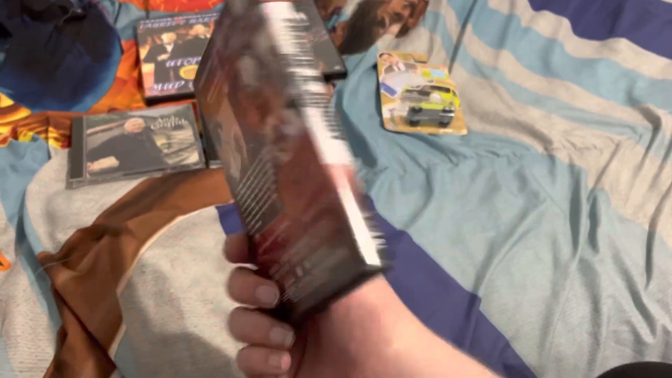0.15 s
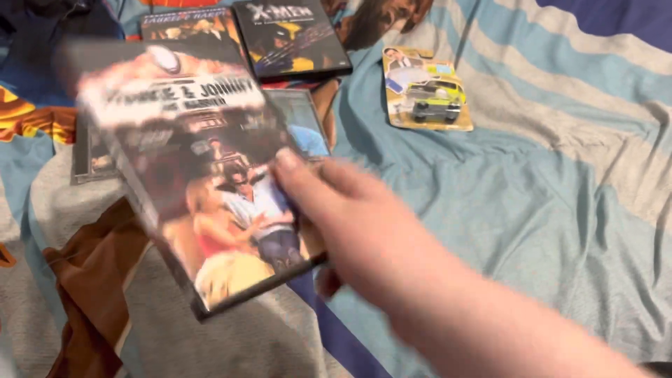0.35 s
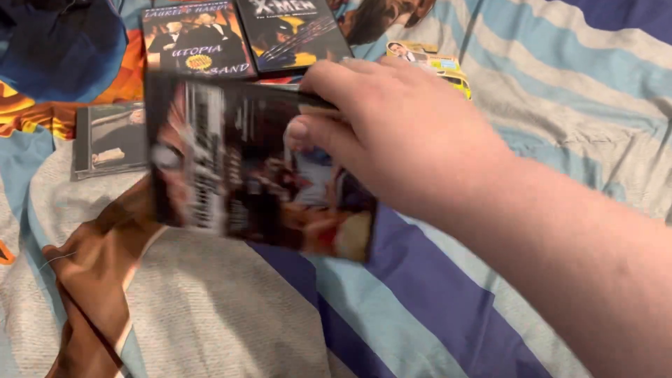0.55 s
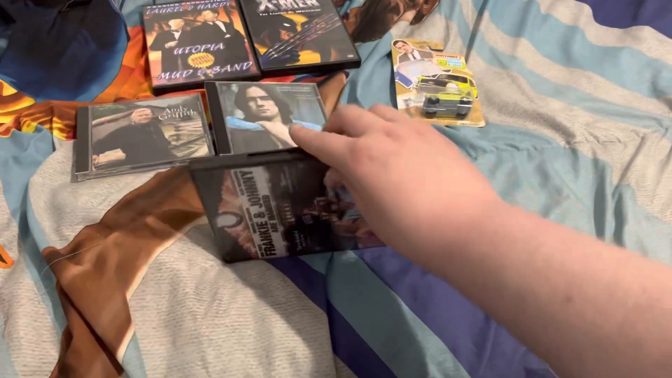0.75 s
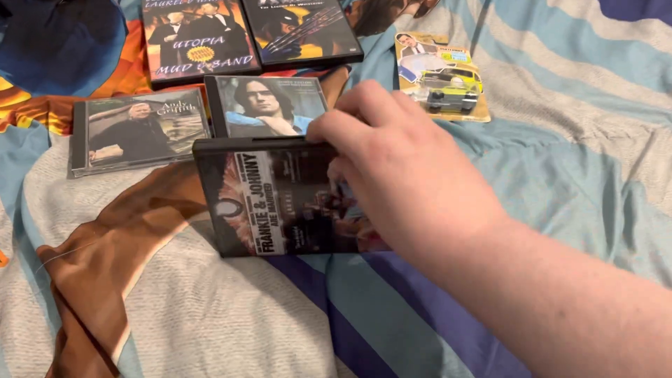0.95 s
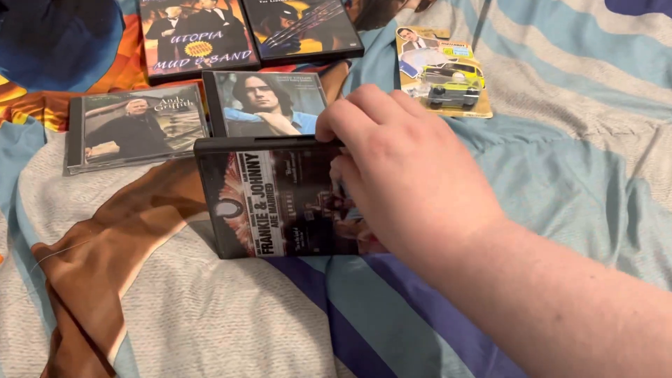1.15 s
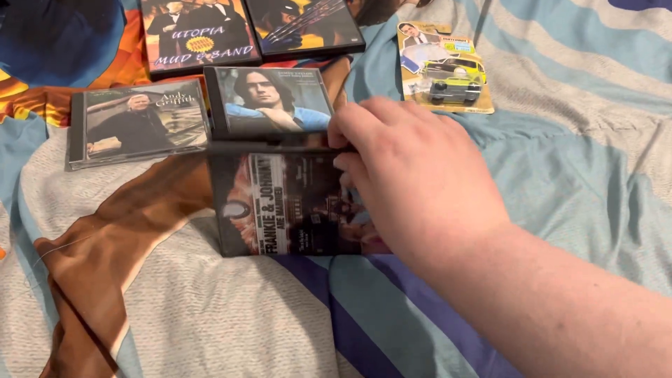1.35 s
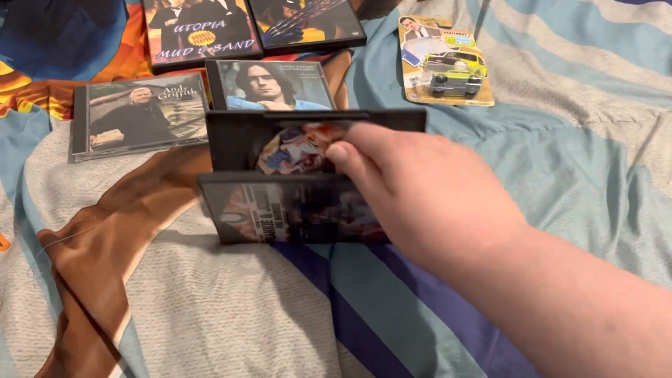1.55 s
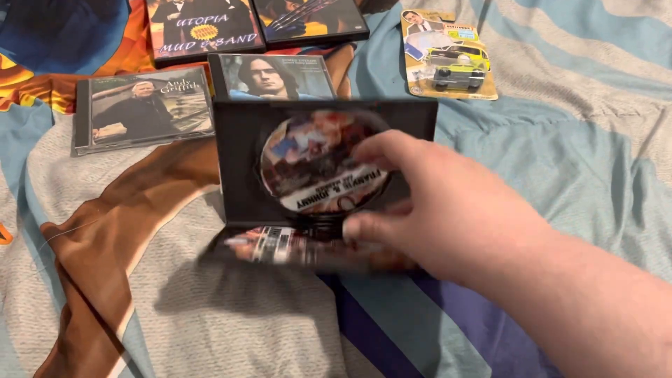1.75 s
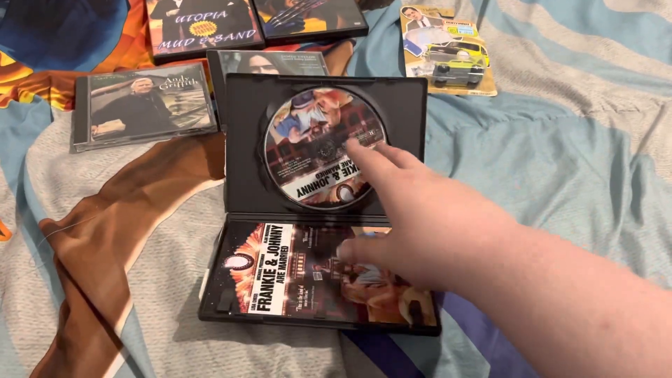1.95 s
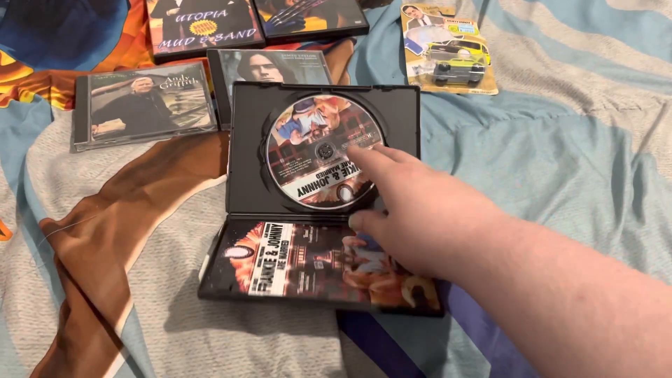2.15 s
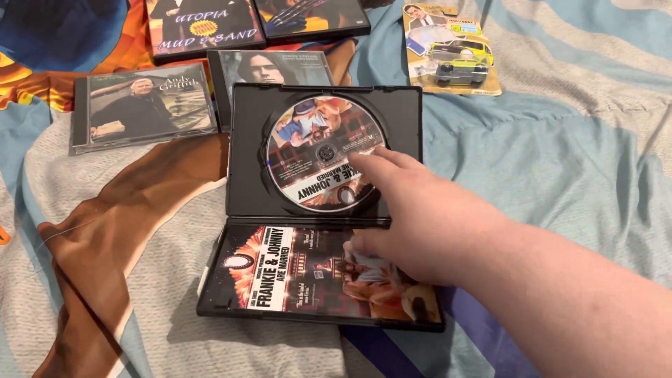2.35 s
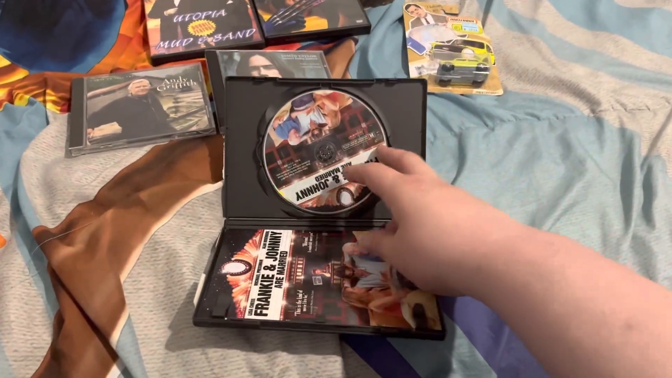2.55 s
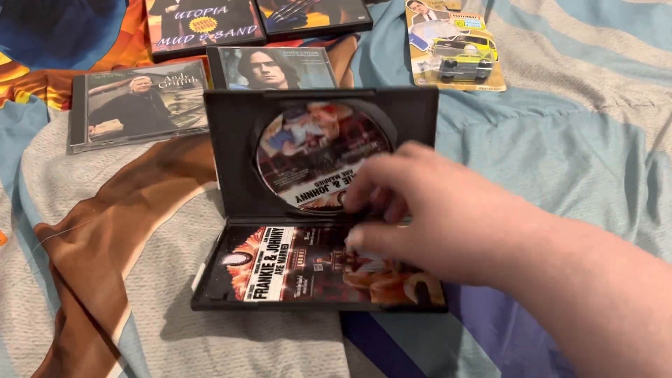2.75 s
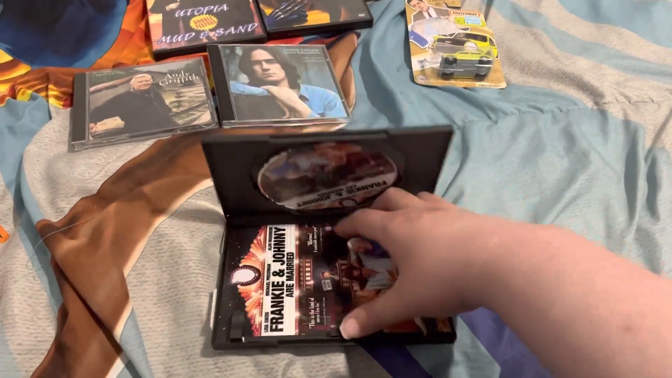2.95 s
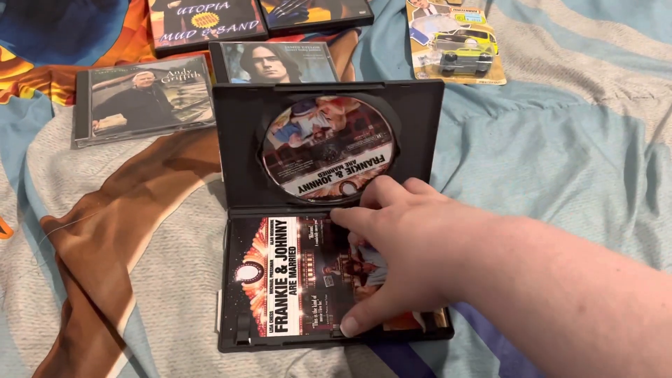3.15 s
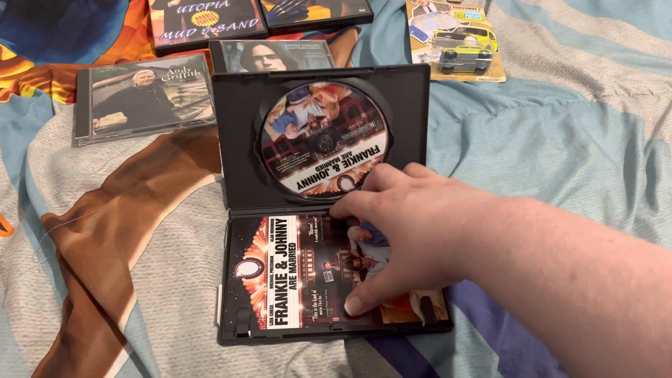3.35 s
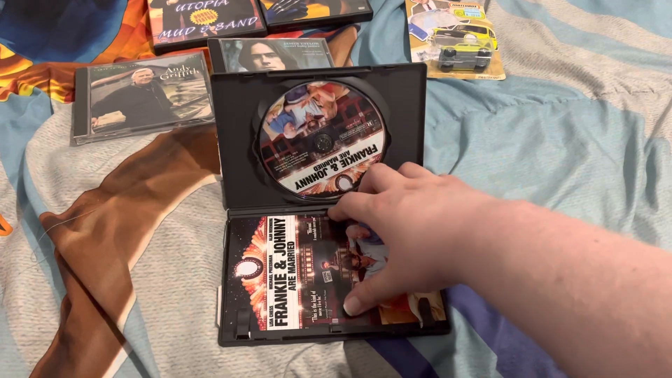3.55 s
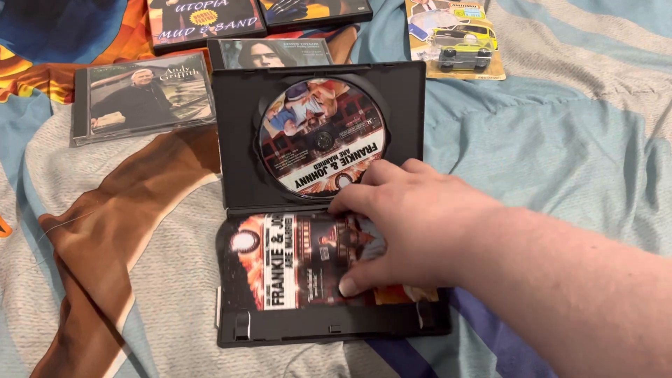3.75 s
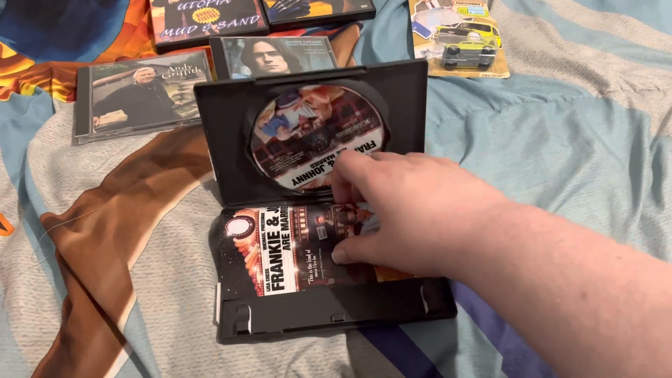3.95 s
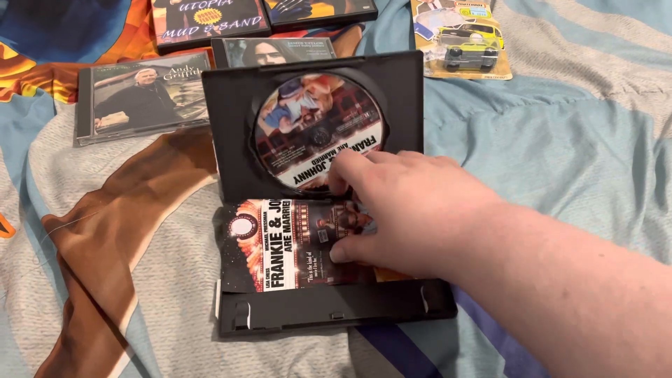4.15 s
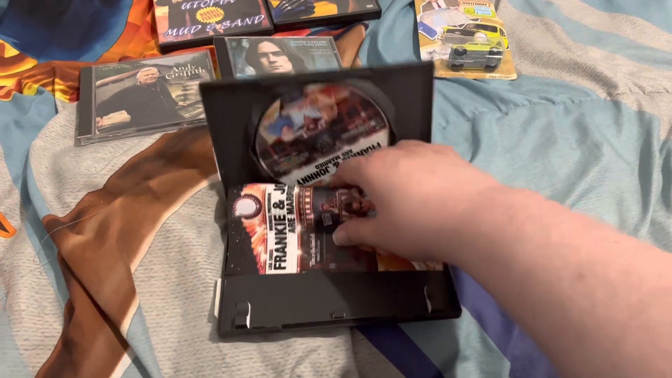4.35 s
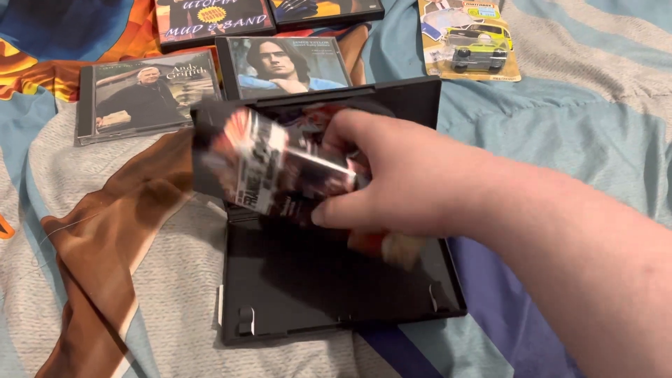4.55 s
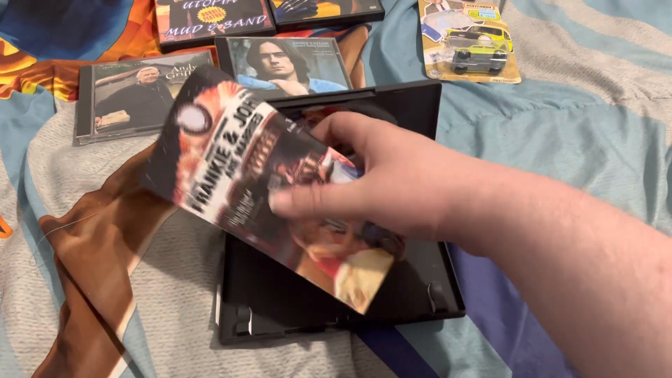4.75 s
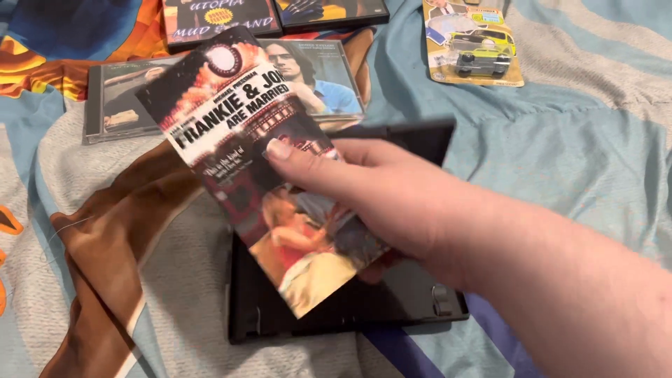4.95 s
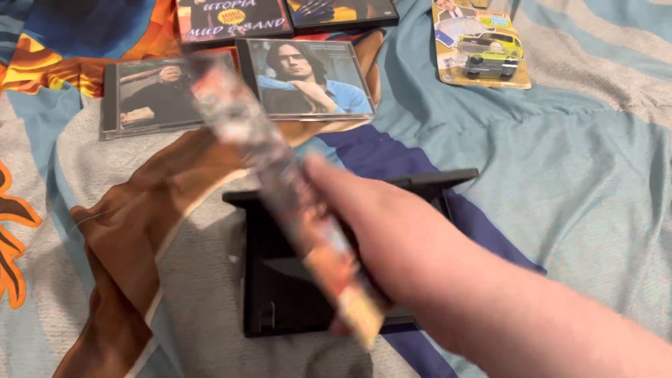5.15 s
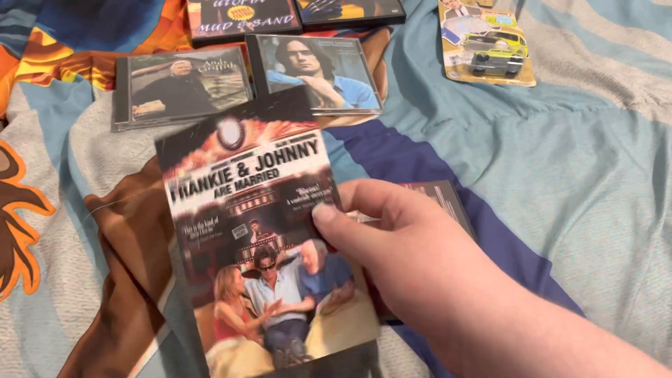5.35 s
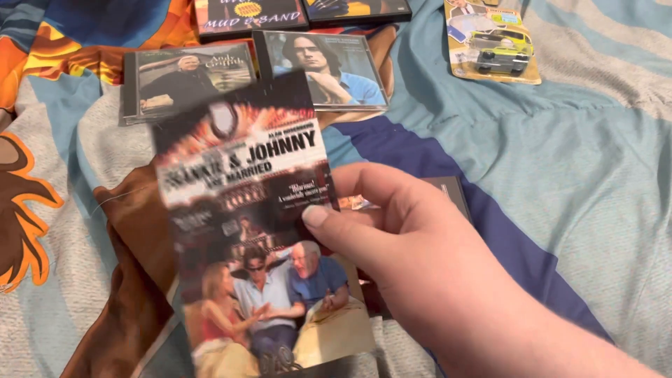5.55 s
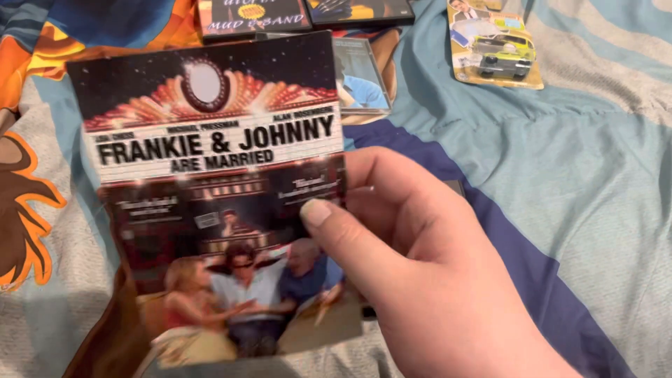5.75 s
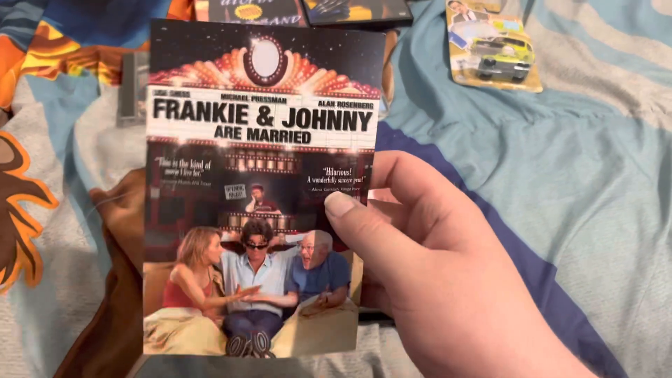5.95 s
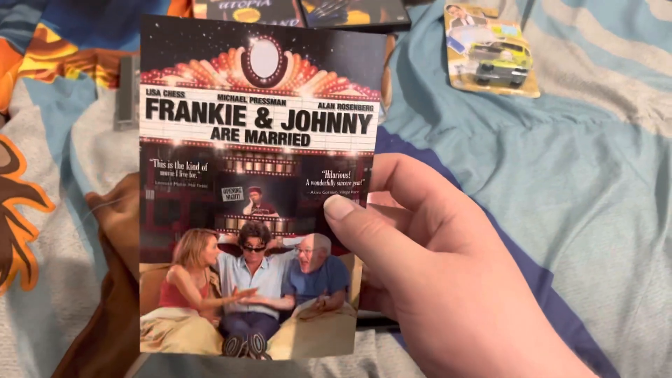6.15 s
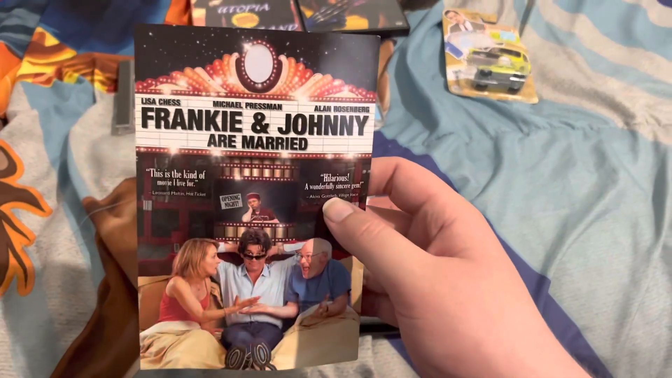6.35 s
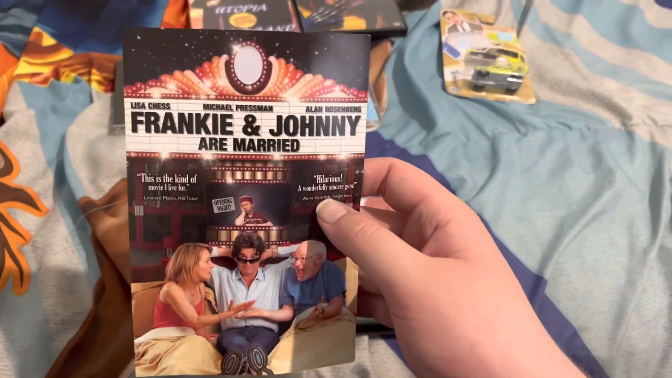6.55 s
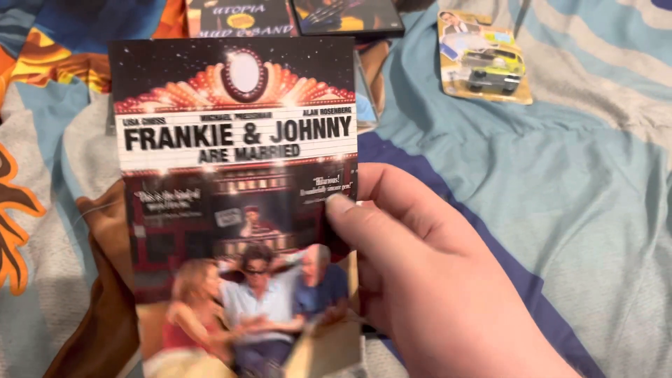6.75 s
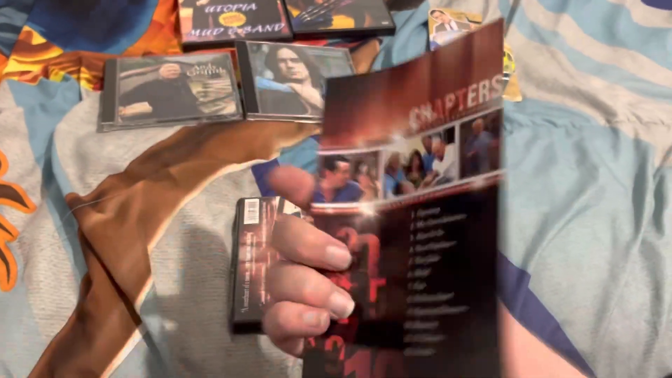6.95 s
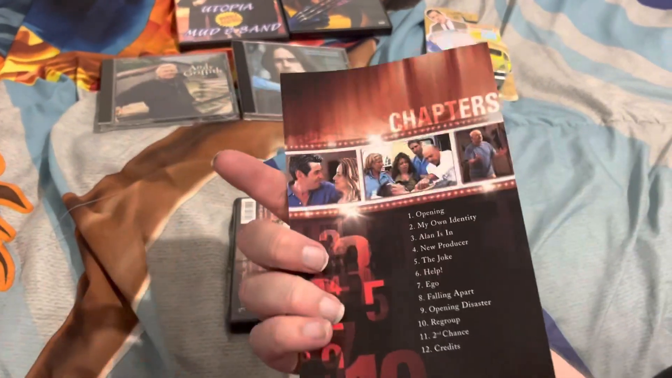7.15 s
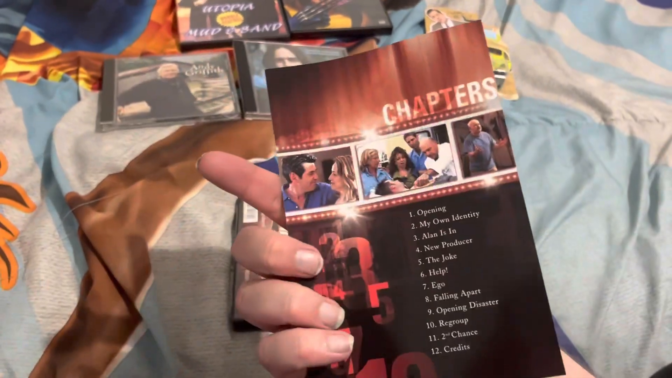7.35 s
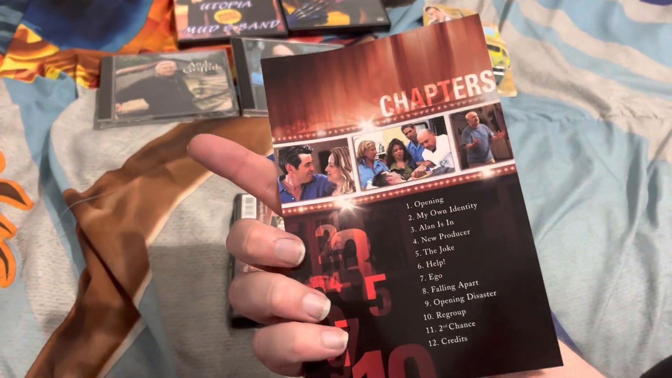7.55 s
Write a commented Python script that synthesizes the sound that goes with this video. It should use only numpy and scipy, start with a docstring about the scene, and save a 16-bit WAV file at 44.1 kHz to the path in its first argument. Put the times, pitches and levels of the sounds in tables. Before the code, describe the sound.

Close stereo handling sounds, slightly left of centre, with little echo. Soft finger rubbing and small ticks lead to a sharp plastic crack ringing briefly in a hollow shell. Quiet shuffling and scattered clicks follow, then a paper sheet rasps out from plastic clips in a rapid crackling cluster. Paper flexes and flicks gently afterwards, with bedding rustle, a low hum and still air beneath.

```python
"""A hand turns a plastic disc case over on a bed, snaps it open, pulls a glossy paper insert from its clips
and flips it. Clicks and snaps are short noise bursts that ring in the hollow case. Fingers and paper slide as
gritty hiss and a coarser scrape, fingertips and corners knock softly, and panels and bedding move low down.
A faint wavering hum and still air fill a quiet, soft room, heard by two close microphone ports."""
import sys
import numpy as np
from scipy import signal
from scipy.fft import rfft, irfft, next_fast_len
from scipy.io import wavfile
from scipy.ndimage import uniform_filter1d

SR = 44100
rng = np.random.default_rng(int(sys.argv[2]) if len(sys.argv) > 2 else 0)


def materialize(psi):
    """Save the field psi as 16-bit PCM at rate SR to the path in sys.argv[1].

    A 1-D psi becomes a single channel; in a 2-D psi each row is a channel.
    """
    bounded = np.clip(np.atleast_2d(psi).T, -1, 1)
    quanta = np.round(bounded * 32767).astype(np.int16)
    wavfile.write(sys.argv[1], SR, quanta)


def attenuation_scalar(level_db):
    """Turn a level in dB into a linear amplitude multiplier (20 dB per decade)."""
    decades = np.asarray(level_db, float) / 20
    return 10 ** decades


N = 335013
CLOCK = np.arange(0, N / SR + .002, .001)  # times at which the event levels are worked out [s]


def evened(x):
    """Scales to rms 1."""
    return x / np.sqrt(np.mean(x ** 2) + 1e-20)


def read(points, hz):
    """Reads a spectrum table on a log-frequency axis."""
    f, value = np.transpose(points)
    return np.interp(np.log(hz + 1), np.log(f + 1), value)


def curve(rows, column, t):
    """Reads one column of a time table."""
    rows = np.asarray(rows)
    return np.interp(t, rows[:, 0], rows[:, column])


def band(x, lo_hz, hi_hz, order=2):
    """Band-pass."""
    return signal.sosfilt(signal.butter(order, [lo_hz, hi_hz], "band", fs=SR, output="sos"), x)


def resonate(x, hz, width):
    """Shifts hz down to zero, smooths, shifts back: a resonance of gain 1."""
    turn = np.exp(2j * np.pi * np.cumsum(hz * np.ones(len(x))) / SR)
    r = np.exp(-np.pi * width / SR)
    smooth = signal.lfilter([1 - r], [1, -r], x / turn + 1e-18)
    return 2 * (turn * smooth).real


def grit(per_s, spread_db, hiss):
    """Friction: a hiss plus sparse tiny catches of uneven size."""
    size = attenuation_scalar(spread_db * np.minimum(rng.exponential(1, N), 4))
    size = size * (rng.random(N) < per_s / SR)
    return hiss * rng.standard_normal(N) + evened(size * rng.standard_normal(N))


def power(start, end, start_db, end_db, rise, fall):
    """Power over time of each event: rises to its start, runs to its end, then falls (dB per second)."""
    start, end, start_db, end_db = (np.reshape(v, (-1, 1)) for v in (start, end, start_db, end_db))
    along = np.clip((CLOCK - start) / np.maximum(end - start, 1e-4), 0, 1)
    db = start_db + (end_db - start_db) * along
    db = db - rise * np.maximum(start - CLOCK, 0) - fall * np.maximum(CLOCK - end, 0)
    return attenuation_scalar(2 * np.maximum(db, -140))


def gain(*powers):
    """Adds powers and gives the gain at every sample."""
    return np.interp(np.arange(N) / SR, CLOCK, np.sqrt(np.vstack(powers).sum(0)))


# colour of the still air and microphone hiss: (frequency [Hz], relative level [dB per Hz])
AIR_COLOUR = [(12, -60.5), (20, -27.5), (75, -13), (89, -8.5), (108, -2), (131, -21), (147, -23),
              (599, -41), (652, -40), (1320, -43.5), (16500, -54.5)]
# how alike the air is left and right: (frequency [Hz], likeness [0 to 1])
AIR_LIKENESS = [(60, 0.81), (240, 0.42), (950, 0.18), (3770, 0.24), (15000, 0.12)]
AIR_DB = -70.5  # level of the left port between 87 and 16000 Hz


def air():
    """Still room air and microphone hiss, most alike in both ports in the bass."""
    hz = np.fft.rfftfreq(N, 1 / SR)
    left, other = rfft(rng.standard_normal((2, N)))
    same = np.clip(read(AIR_LIKENESS, hz), -1, 1)
    right = same * left + np.sqrt(1 - same ** 2) * other
    pair = irfft(np.array([left, right]) * attenuation_scalar(read(AIR_COLOUR, hz)), N)
    return attenuation_scalar(AIR_DB) * pair / np.std(band(pair[0], 87, 16000))


# loudness of the hum: (time [s], level [dB])
HUM_LEVEL = [(0.0, -56.5), (0.4, -60), (1.5, -62), (2.5, -63), (4.0, -56), (4.74, -59), (5.6, -64),
             (6.5, -70.5), (7.0, -65), (7.6, -66)]
HUM_HZ, HUM_WIDTH_HZ = 102, 9


def hum():
    """A faint low tone that wavers: a steady sine plus noise narrowed around the same pitch."""
    waver = resonate(rng.standard_normal(N), HUM_HZ, HUM_WIDTH_HZ)
    waver = resonate(waver, HUM_HZ, 3 * HUM_WIDTH_HZ)
    t = np.arange(N) / SR
    steady = np.sqrt(2) * np.sin(2 * np.pi * HUM_HZ * t)
    return attenuation_scalar(curve(HUM_LEVEL, 1, t)) * evened(0.69 * steady + 0.81 * evened(waver))


# how long the room's echoes take to die by 60 dB: (frequency [Hz], time [s])
ECHO_TIMES = [(200, 0.084), (800, 0.16), (3000, 0.063), (10000, 0.36)]


def room(x):
    """Sparse echoes of random sign, each band dying at its own speed, different at each port."""
    taps = np.zeros((2, SR // 2))
    at = np.arange(200, SR // 2 - 20, 20) + rng.integers(0, 20, (2, (SR // 2 - 201) // 20))
    np.put_along_axis(taps, at, rng.choice([-1., 1.], at.shape), 1)
    hz, t, z = signal.stft(taps, SR, nperseg=256)
    z *= attenuation_scalar(-60 * t / read(ECHO_TIMES, hz)[:, None]) * (hz[:, None] > 100)
    tail = signal.istft(z, SR, nperseg=256)[1]
    return signal.fftconvolve(x[None], tail / np.linalg.norm(tail[0]), axes=1)[:, :N]


# how far the left port leads the right: (frequency [Hz], phase [radians])
PORT_LEAD = [(0, 0), (1030, .6), (1720, .1), (2400, .6), (3800, 1.1), (5200, -.1), (7200, -2.1),
             (7800, -np.pi), (9300, -np.pi), (10800, -2 * np.pi), (12900, -2 * np.pi), (14600, -3 * np.pi),
             (22050, -3 * np.pi)]
# gain on the difference between the ports: (frequency [Hz], gain [dB])
PORT_DIFFERENCE = [(60, -20.5), (350, -16.5), (600, 5), (4000, 5), (7000, -4), (7800, -11.5), (9300, -13.5),
                   (10200, -6.5), (11300, -23.5), (13600, -9), (15000, -16.5)]


def ports(pair):
    """Two close ports: their difference is scaled and their phases turned apart, by frequency."""
    size = next_fast_len(N + 2048)
    hz = np.fft.rfftfreq(size, 1 / SR)
    left, right = rfft(pair, size)
    both = (left + right) / 2
    apart = (left - right) / 2 * attenuation_scalar(read(PORT_DIFFERENCE, hz))
    turn = np.exp(.5j * read(PORT_LEAD, hz))  # half the lead goes to each port
    return irfft(np.array([(both + apart) * turn, (both - apart) / turn]), size)[:, :N]


# jolts that shake the whole case and leave it rattling; levels are relative within each layer:
# (time [s], hiss level [dB], brightness [dB per octave], drag level [dB], bump level [dB])
JOLT_EVENTS = [(0.668, -51.5, 3, -52, -50), (0.912, -65, -2, -65.5, -54.5), (0.985, -67, 1.05, -92, -60),
               (1.019, -70.5, 0.1, -63, -53.5), (1.204, -42, 4, -45, -40.5), (1.309, -77, 3, -77, -44),
               (1.363, -20.5, -0.75, -20, -25), (1.501, -42.5, -2, -66.5, -28.5),
               (1.603, -41.5, 1, -48, -37.5), (1.771, -69, -2.5, -84, -62), (1.82, -65.5, 1.5, -77, -51),
               (1.858, -59.5, 5, -76, -47), (2.165, -75.5, 3, -97, -72), (2.561, -85, 3, -94.5, -60.5),
               (2.584, -81, 2.5, -92, -60), (2.609, -61.5, 4.5, -92, -71), (2.89, -73.5, 1.5, -78, -54),
               (2.99, -60, -1.9, -49, -37), (3.13, -76.5, 3, -64, -55), (3.271, -55.5, 3.5, -59, -32),
               (4.043, -55, 0.8, -43, -38), (4.123, -58, -4, -51, -68), (4.262, -38.5, -2.5, -29, -42.5),
               (4.347, -39.5, -2.5, -34, -33.5), (4.489, -48.5, -3.5, -39.5, -37.5),
               (4.55, -52, -0.2, -60, -43.5), (4.605, -43.5, 0.5, -67, -47), (4.688, -41, -3, -36, -38.5),
               (4.739, -50.5, -0.1, -62, -38.5), (4.951, -71, 4, -77, -61), (5.01, -70.5, 3.5, -74, -42),
               (5.186, -65, 3.5, -73, -43.5), (5.306, -61, 6, -44, -45), (5.326, -63, 5.5, -42, -35.5),
               (5.371, -60, 7.5, -76, -43), (5.501, -67.5, 3.5, -84, -52.5), (6.63, -87.5, 2.5, -67.5, -73),
               (6.7, -69.5, 3.5, -57, -68), (6.963, -52.5, -7.5, -50.5, -42), (7.18, -67, -3, -60.5, -61)]
JOLT_RISE_DB_PER_S = 3001.5  # for hiss and drag


def jolts(column, rise, fall):
    """How strongly the jolts drive one layer: each rises to its peak and dies away."""
    s, db = np.transpose(JOLT_EVENTS)[[0, column]]
    return power(s, s, db, db, rise, fall)


# the large panels flap: (start [s], hold [s], level [dB])
PANEL_FLAPS = [(0.954, 0.17, -43), (1.23, 0.03, -46), (1.388, 0.01, -31), (1.534, 0.006, -45.5),
               (1.62, .01, -55), (1.74, 0.077, -54.5), (2.86, 0.0044, -54), (3.051, 0.16, -40.5),
               (3.299, 0.034, -34.5), (3.461, 0.0057, -44), (3.76, 0.087, -58), (4.288, .005, -58.5),
               (4.36, .005, -44.5), (4.502, 0.08, -52), (4.79, 0.047, -48.5), (4.955, 0.0093, -44),
               (5.16, 0.0091, -49.5), (5.321, 0.018, -41.5), (6.714, .005, -42.5), (6.85, 0.12, -51.5),
               (6.975, 0.0077, -36)]
# dull rustle of hand and case on the bedding, before a trim: (time [s], level [dB])
BEDDING_RUSTLE = [(0.0, -78), (0.38, -70.5), (0.6, -57.5), (0.82, -68), (1.08, -60.5), (1.17, -71),
                  (1.9, -61), (2.1, -69), (2.4, -70.5), (2.78, -74), (3.56, -72.5), (3.85, -53.5),
                  (4.02, -64), (4.8, -57), (5.3, -67), (5.9, -64), (6.25, -78.5), (6.8, -79.5), (6.96, -59),
                  (7.06, -77), (7.25, -85), (7.4, -65), (7.6, -83)]
FLAP_RISE_DB_PER_S, FLAP_FALL_DB_PER_S, FLAP_REST_DB = 378, 261, -68
BUMP_RISE_DB_PER_S, BUMP_DIES_DB_PER_S = 2200, 549.5


def shifting():
    """Large panels flap slowly at 50-100 Hz; bumps and bedding give a dull rustle, strongest in the bass."""
    drive = band(grit(per_s=400, spread_db=2, hiss=1.2), 60, 1000)
    wobble = band(rng.standard_normal(N), 46, 93)
    swing = abs(signal.hilbert(wobble, next_fast_len(N))[:N])
    wobble = evened(wobble / (swing + 0.68 * np.std(wobble)))  # evens out the swings
    rustle = band(drive, 115, 480, order=1)
    rustle = evened(rustle + .8 * resonate(drive, 150, 90) + .5 * resonate(drive, 300, 120))
    s, hold, db = np.transpose(PANEL_FLAPS)
    flaps = power(s, s + hold, db, db, FLAP_RISE_DB_PER_S, FLAP_FALL_DB_PER_S)
    flap = gain(flaps, attenuation_scalar(2 * FLAP_REST_DB + 0 * CLOCK))
    bumps = jolts(column=4, rise=BUMP_RISE_DB_PER_S, fall=BUMP_DIES_DB_PER_S)
    bump = gain(bumps, attenuation_scalar(2 * curve(BEDDING_RUSTLE, 1, CLOCK)))
    return flap * wobble + attenuation_scalar(-2.5) * bump * rustle


# soft knocks of fingertips, case corners and flexing paper: (time [s], peak level [dB], note [Hz])
SOFT_KNOCKS = [(0.42, -54.5, 452), (0.469, -50, 775), (0.489, -51, 960), (0.634, -53, 340),
               (0.919, -52, 333), (1.219, -39.5, 750), (1.249, -41, 780), (1.379, -22.5, 888),
               (1.403, -26, 1090), (1.443, -30, 1030), (1.466, -33, 970), (1.914, -51, 455),
               (1.963, -51.5, 818), (1.989, -54, 783), (2.019, -64, 404), (2.044, -57.5, 900),
               (2.439, -63.5, 934), (2.56, -53, 323), (2.584, -57, 350), (4.543, -37, 398),
               (4.569, -50, 474), (4.609, -46, 420), (4.629, -49, 392), (4.732, -35, 336),
               (4.793, -49, 333), (5.011, -44.5, 345), (5.034, -48, 288), (5.067, -42, 544),
               (5.199, -45.5, 464), (5.218, -49, 376), (5.279, -45, 517), (5.347, -36, 442)]
KNOCK_CYCLES, KNOCK_SPREAD = 4, .12  # how long a knock rings; scales the random gap between its notes


def knocks():
    """A padded contact: no crack, only a close pair of notes that swell and die within a few cycles."""
    out, t = np.zeros(N + 4000), np.arange(4000) / SR
    for (s, db, hz), (a, b) in zip(SOFT_KNOCKS, rng.random((len(SOFT_KNOCKS), 2))):
        u = t * hz / KNOCK_CYCLES * 3
        second_hz = hz * (1 + KNOCK_SPREAD * (4 * a - 2))
        pair = np.sin(2 * np.pi * hz * t) + .6 * np.sin(2 * np.pi * (second_hz * t + b))
        sound = pair * u * np.exp(1 - u)
        out[round(s * SR):][:4000] += attenuation_scalar(db) * sound / abs(sound).max()
    return out[:N]


# short rasps of a paper edge or nail, swelling and cut off:
# (start [s], end [s], level [dB], centre [Hz], width [share of centre])
EDGE_RASPS = [(0.89, 0.935, -68.5, 2900, .12), (1.503, 1.556, -47, 3200, .15), (1.64, 1.764, -64, 2750, .1),
              (2.44, 2.497, -64.5, 5200, .3), (2.615, 2.687, -79, 2950, .15), (4.3, 4.32, -28, 4750, .12),
              (4.433, 4.457, -24.5, 5810, .3), (4.436, 4.456, -30.5, 11800, .3),
              (4.763, 4.816, -46, 1920, .3), (4.84, 4.986, -62.5, 1050, .12),
              (7.238, 7.396, -66, 2750, .25), (7.401, 7.508, -71, 2700, .3)]


def rasps():
    """A narrow scratch that grows until the edge slips free."""
    drive, out = grit(per_s=1500, spread_db=0.5, hiss=2.0), np.zeros(N)
    for start, end, db, hz, share in EDGE_RASPS:
        part = slice(round(start * SR), round(end * SR))
        scratch = resonate(drive[part], hz, share * hz)
        scratch = evened(resonate(scratch, hz, 1.25 * share * hz))
        u = np.linspace(0, 1, len(scratch))
        out[part] += attenuation_scalar(db) * scratch * u ** 0.5 * np.minimum((1 - u) / 0.11, 1)
    return out


# short slides of fingers over case and paper, relative levels:
# (start [s], end [s], level at start [dB], level at end [dB], brightness [dB per octave])
FINGER_SLIDES = [(0.085, 0.125, -71, -70.5, -2.5), (0.222, 0.391, -63, -63.5, 3.5),
                 (0.5, 0.605, -63, -72, 4.5), (0.617, 0.806, -64.5, -72, 1.5),
                 (1.461, 1.552, -50, -44.5, -3), (1.701, 1.883, -64, -63.5, 2.03),
                 (1.919, 1.98, -67.5, -76.5, 2.5), (2.446, 2.516, -71, -76.5, 6.5),
                 (2.611, 2.681, -71, -75, 3), (2.77, 2.786, -74.5, -74, 12.5), (2.834, 2.977, -61, -64, 5),
                 (3.028, 3.2, -62.5, -83, 0), (3.295, 3.409, -54.5, -63.5, 0.5),
                 (6.681, 6.955, -65.5, -54, 2), (6.978, 7.035, -60.5, -68.5, 0.5),
                 (7.099, 7.185, -61, -60, -6.5), (7.265, 7.489, -78, -78, -1.5)]
TOUCH_DB_PER_S, LIFT_DB_PER_S = 598, 381  # how fast a slide sets in and ends


def strokes(shift_db):
    """How strongly the finger slides drive one layer."""
    start, end, start_db, end_db, _ = np.transpose(FINGER_SLIDES)
    return power(start, end, start_db + shift_db, end_db + shift_db, TOUCH_DB_PER_S, LIFT_DB_PER_S)


# the insert is pulled from its clips and lifted away, relative levels:
# (time [s], hiss level [dB], brightness [dB per octave], drag level [dB])
INSERT_PULL = [(3.51, -90, 3, -85), (3.597, -46, 0, -50), (3.8, -44, -1, -43), (3.825, -51, 3, -49),
               (4.01, -58, 1.1, -58), (4.148, -64, -3, -68), (4.185, -44, 0.9, -46),
               (4.262, -28, -1.9, -36), (4.31, -30, -1.2, -42), (4.39, -35.5, -0.2, -45),
               (4.45, -33, 0, -46), (4.53, -57, -1.2, -68), (4.654, -60, 2.5, -65), (4.69, -43, -1.1, -52),
               (4.8, -51, -1, -53), (4.91, -61, 2, -66), (5.32, -54, 3, -72), (5.46, -69, 5.5, -72),
               (5.517, -61.5, 4.5, -74), (5.79, -72, 2.5, -90), (5.94, -68, 2.5, -90), (6.0, -95, 1.4, -95)]


def pulling(column):
    """How strongly the pull on the insert drives one layer, as power."""
    return attenuation_scalar(2 * curve(INSERT_PULL, column, CLOCK))


# resonances of the air and walls of the open case: (frequency [Hz], width [Hz], level [dB])
CASE_HOLLOW = [(1050, 250, -6.5), (1380, 98, -7.5), (1790, 80, -4), (1970, 57, -6)]
DRAG_DIES_DB_PER_S = 299.5
DRAG_DB, DRAG_DB_PER_BRIGHTNESS = -5, -0.27  # duller slides press harder on the hollow shell
DRAG_TOP_DB = -32  # ceiling on the drag level, so the snaps stand out above the scrape


def scrape():
    """Coarser catches coloured by the hollow of the open case."""
    drive = grit(per_s=640, spread_db=4, hiss=1.3)
    ringing = sum(attenuation_scalar(db) * resonate(drive, hz, width) for hz, width, db in CASE_HOLLOW)
    boxed = evened(band(0.28 * drive + ringing, 850, 1800))
    jolt = jolts(column=3, rise=JOLT_RISE_DB_PER_S, fall=DRAG_DIES_DB_PER_S)
    stroke = strokes(DRAG_DB + DRAG_DB_PER_BRIGHTNESS * np.transpose(FINGER_SLIDES)[4])
    drag = gain(jolt, pulling(3), stroke)
    return np.minimum(drag, attenuation_scalar(DRAG_TOP_DB)) * boxed


# basic colour of the sliding hiss: (frequency [Hz], relative level [dB per Hz])
HISS_COLOUR = [(700, -22), (1500, -6.5), (2800, 1.5), (5000, -5.5), (7000, -6), (9000, -7.5),
               (12500, -17.5), (15500, -19.5), (16500, -42)]
HISS_DIES_DB_PER_S = 232.5


def slide():
    """Gritty hiss whose colour tilts with pressure and angle, in drifting patches."""
    jolt = jolts(column=1, rise=JOLT_RISE_DB_PER_S, fall=HISS_DIES_DB_PER_S)
    stroke, pull = strokes(0), pulling(1)
    tilt = np.transpose(JOLT_EVENTS)[2] @ jolt + np.transpose(FINGER_SLIDES)[4] @ stroke
    tilt += curve(INSERT_PULL, 2, CLOCK) * pull
    tilt /= jolt.sum(0) + stroke.sum(0) + pull  # the loudest contact weighs most
    hz, t, z = signal.stft(grit(per_s=1200, spread_db=3, hiss=1.9), SR, nperseg=256, noverlap=192)
    patches = uniform_filter1d(rng.standard_normal(z.shape), 4, 0)
    patches = evened(uniform_filter1d(patches, 24, 1))
    octaves = np.log2((hz[:, None] + 100) / 4200)
    colour = attenuation_scalar(read(HISS_COLOUR, hz)[:, None] + np.interp(t, CLOCK, tilt) * octaves)
    colour /= np.sqrt(np.mean(colour[(hz > 2500) & (hz < 7000)] ** 2, 0))  # tilt keeps this band's level
    colour *= attenuation_scalar(3 * patches)
    shaped = signal.istft(z * colour, SR, nperseg=256, noverlap=192)[1][:N]
    return attenuation_scalar(-4.0) * gain(jolt, stroke, pull) * shaped / np.std(band(shaped, 2500, 7000))


# clicks of latch, hinge, clips and paper; crack and thud are relative to the note, before a trim:
# (time [s], note peak level [dB], note [Hz], crack level [dB], thud level [dB])
CASE_CLICKS = [(0.241, -45.5, 1890, -40, -49), (0.42, -48.5, 2270, -13, -34), (0.469, -55, 2400, -6, -42),
               (0.659, -30, 2330, -18, -44), (0.685, -43, 740, -17, -1), (0.921, -53, 623.5, -15.5, -6),
               (0.98, -59.5, 764.4, 0.5, 9), (1.174, -59, 910, -3, 0.5),
               (1.202, -18.5, 802.4, -10.5, -19.5), (1.36, -9.5, 823.4, -24, -16.5),
               (1.363, -9.5, 907, -21.5, -5), (1.37, -10.5, 1057, -18, -18.5),
               (1.387, -13.5, 1939, -9.5, -4.5), (1.5, -23, 1048, -12.5, -14), (1.511, -29, 965.4, -5, -7),
               (1.546, -28, 2798, -24.5, -28), (1.599, -26, 3297, -10.5, -11),
               (1.614, -36, 1486, -12, -5.5), (1.73, -40, 2760, -3, -33), (1.769, -38.5, 950, -20, -4),
               (1.808, -35.5, 2795, -24.5, -4.5), (1.848, -40, 664, -16, -3.5),
               (1.915, -54.5, 2730, -11.5, -18.5), (1.938, -52, 1460, -30.5, -30),
               (2.601, -50, 3640, 8.5, -24.5), (2.726, -66.5, 3500, -11.5, -39.5),
               (2.847, -43.5, 3390, -13.5, -11), (2.883, -37.5, 5400, -19, -12),
               (2.918, -43.5, 1020, -37, -5), (2.986, -20, 3189, -24.5, -15.5),
               (3.131, -42.5, 900, -19, -17), (3.269, -21, 1002, 6, -13.5), (3.339, -31.5, 3093, -3, -36.5),
               (3.481, -65, 902, -17, -11), (3.594, -21.5, 6800, 3.5, -59.5),
               (3.873, -27.5, 972.4, -18.5, -42), (3.925, -34, 1350, -17.5, -27),
               (4.044, -19.5, 1308, -30.5, -24.5), (4.119, -36, 1461, -30, -37.5),
               (4.183, -33, 1219, -15.5, -25.5), (4.19, -31.5, 1401, -16.5, -23),
               (4.244, -6.5, 2230, -23.5, -46.5), (4.249, -10.5, 1195, -13, -33),
               (4.26, -10.5, 1319, -35, -36), (4.265, -12, 1400, -22, -30.5),
               (4.272, -11, 1734, -24.5, -39.5), (4.277, -8, 1816, -33, -36),
               (4.281, -6.5, 1419, -24.5, -33.5), (4.286, -11.5, 1415, -34, -33),
               (4.325, -8, 1600, -27, -25.5), (4.345, -18.5, 2720, -16.5, -18.5),
               (4.361, -4.5, 1766, -16, -43.5), (4.475, -16.5, 1022, -26.5, -16),
               (4.48, -19, 1578, -25.5, -16), (4.543, -28, 2798, -10, -11), (4.549, -30, 3300, -11.5, -30),
               (4.593, -29.5, 1795, -14, -10), (4.6, -28.5, 2150, -15, -20),
               (4.683, -19.5, 916, -15.5, -21), (4.691, -12, 1732, -18, -35.5),
               (4.972, -48, 3300, -23, -40), (5.007, -45.5, 1240, -7, -6), (5.171, -39.5, 1380, -25.5, -1),
               (5.235, -48, 2250, -7, -28), (5.265, -24.5, 2820, -14, -49), (5.307, -39, 1490, -19.5, -29),
               (5.324, -30.5, 1210, -25.5, -43), (5.347, -37.5, 710, -12, -40),
               (5.498, -57, 5170, -23, 6.5), (5.935, -48, 1380, -11, -15.5),
               (6.625, -62.5, 1140, -29.5, -23), (6.863, -32.5, 1770, -17, -29),
               (6.904, -40, 2530, -18, -31), (6.944, -42, 2600, -12.5, -30), (7.045, -49, 2670, -8, -16),
               (7.085, -47, 3150, -25, -27), (7.177, -33, 1530, -15, -44), (7.423, -62.5, 2830, -30.5, -5)]
# ringing modes of the hollow case shell: (frequency [Hz], relative level [dB], time to die by 60 dB [s])
SHELL_MODES = [(348.2, -12, .12), (807, -12, .1), (864, -4.5, 0.26), (1065, 4.5, 0.098), (1610, -13, 0.032),
               (1890, -3.5, 0.2), (2076, -13, 0.13), (2760, -4.5, .1), (2940, -11.5, 0.048),
               (4400, -19.5, 0.065), (5220, -7.5, 0.18)]
# where the hand works, left of centre: (time [s], left over right level [dB])
HAND_PLACE = [(0.4, 6), (0.7, 2.2), (1.2, 1.5), (1.75, 2.3), (2.9, 2.5), (3.9, 1.5), (4.2, 2.1), (5.3, 3),
              (6.9, 0.6)]
PLACE_SCATTER_DB = 2.5  # single clicks scatter around the hand's place
SHELL_DB = -21  # how strongly the shell rings, relative to the note


def clicks():
    """Each click is a burst of a few ms that sounds as a crack, its own buckling note, a thud and shell ringing."""
    out, t = np.zeros((2, N + 6000)), np.arange(6000) / SR
    noises = rng.standard_normal((len(CASE_CLICKS), 6000))
    detune = rng.uniform(0.94, 1.03, (len(CASE_CLICKS), len(SHELL_MODES)))
    pans_db = curve(HAND_PLACE, 1, np.transpose(CASE_CLICKS)[0]) + PLACE_SCATTER_DB * noises[:, -1]
    for (s, db, hz, crack_db, thud_db), pan_db, noise, shift in zip(CASE_CLICKS, pans_db, noises, detune):
        # higher notes and harder snaps come from shorter contacts
        contact_s = (0.00085 + 1.1 / hz) * (1 - .55 * attenuation_scalar(db + 3))
        u = t / contact_s
        rattle = attenuation_scalar(-30.5 - 60 * t / 0.056) * np.minimum(u, 1)
        burst = noise * (u * np.exp(1 - u) + rattle)
        note = resonate(burst, hz, .24 * hz)
        note += 0.22 * band(burst, 700, 5000) * np.std(note) / np.std(burst)
        crack = band(burst * np.exp(-.9 * np.minimum(u, 2.5)), 3200, 16000)
        thud = resonate(burst, 350 * shift[0], 110) + 0.91 * resonate(burst, 210 * shift[1], 160)
        # a contact drives most the shell modes that lie near its own note
        shell = sum(attenuation_scalar(g - 9 * abs(np.log2(f / hz)) - 60 * t / d) * np.sin(2 * np.pi * f * k * t)
                    for (f, g, d), k in zip(SHELL_MODES, shift))
        shell = shell * np.minimum(u, 1)
        parts = [(note, 0), (crack, crack_db + 2.0), (thud, thud_db + 4.0), (shell, SHELL_DB)]
        sound = sum(attenuation_scalar(db + g) * part / abs(part).max() for part, g in parts)
        at = round(s * SR) - 30  # the burst starts just before it is heard to rise
        out[:, at:at + 6000] += sound * attenuation_scalar(np.array([[pan_db / 2], [-pan_db / 2]]))
    return out[:, :N]


ROOM_DB, SLIDE_PAN_DB = -7, 2.5  # echo level; left over right level of the rubbing


def scene():
    """Hand and case close by, their echoes, hum and air."""
    pan = attenuation_scalar(np.array([[SLIDE_PAN_DB / 2], [-SLIDE_PAN_DB / 2]]))
    rubbed = (slide() + scrape() + rasps()) * pan
    near = clicks() + rubbed + knocks() + shifting()
    echoes = attenuation_scalar(ROOM_DB) * room(near.mean(0))
    return ports(near + echoes) + hum() + air()


def roll_off(x):
    """The treble ends steeply here."""
    return signal.sosfilt(signal.butter(12, 16810, fs=SR, output="sos"), x)


def record(dry):
    """Turns the finished mix into the final sound."""
    return roll_off(dry)


dry = scene()
out = record(dry)
materialize(out)
```